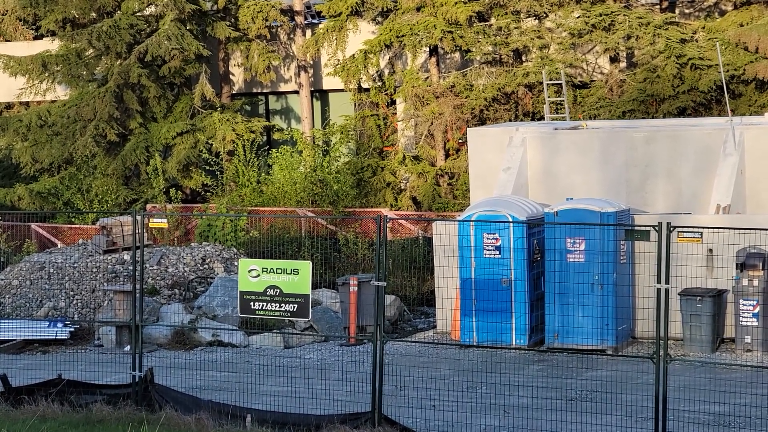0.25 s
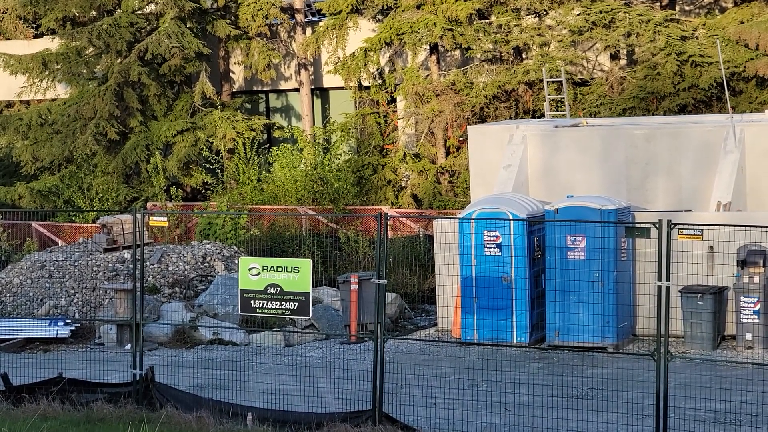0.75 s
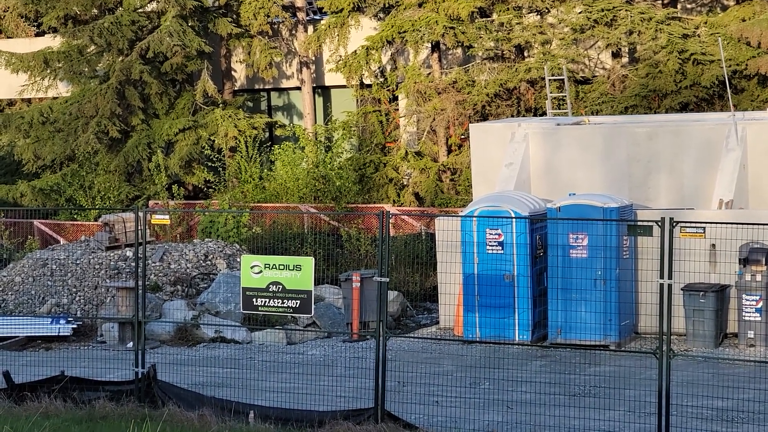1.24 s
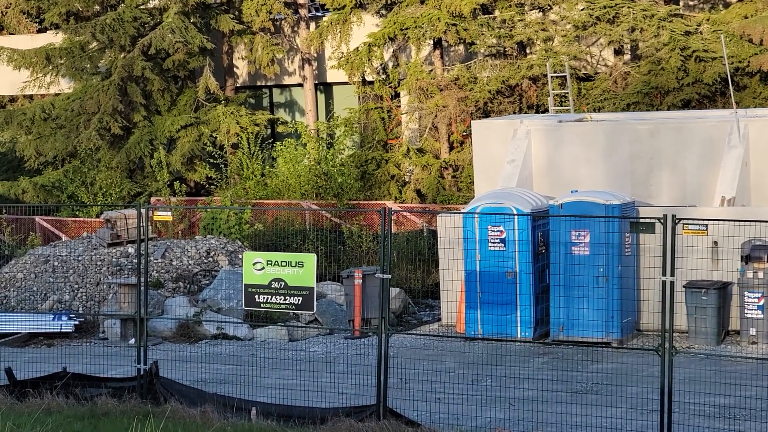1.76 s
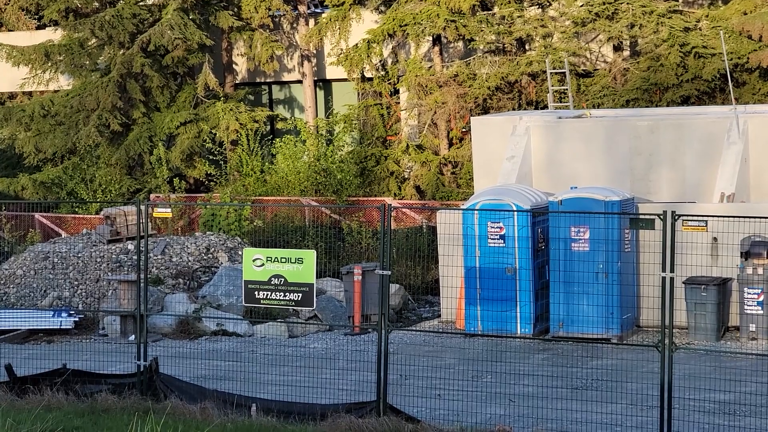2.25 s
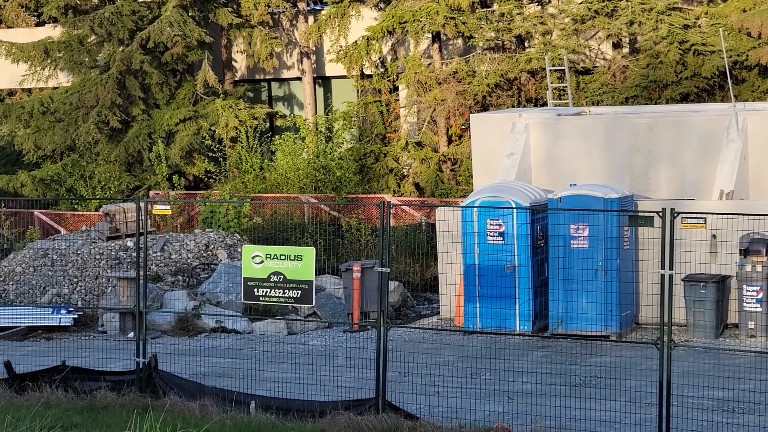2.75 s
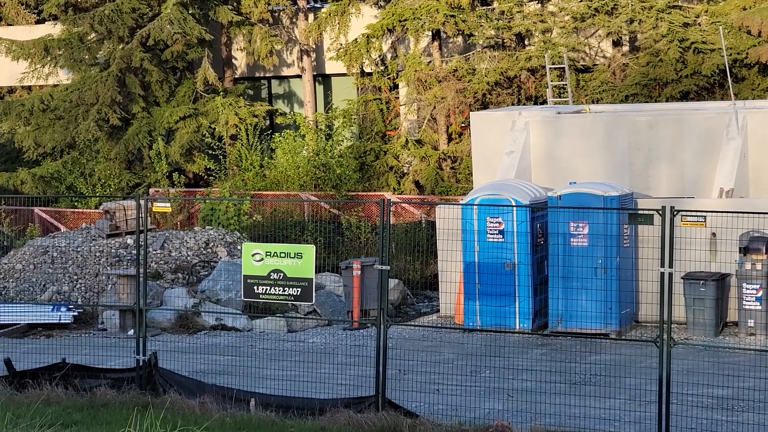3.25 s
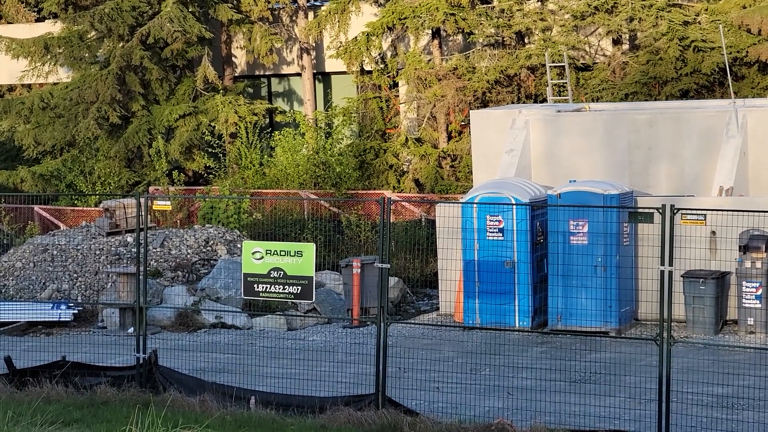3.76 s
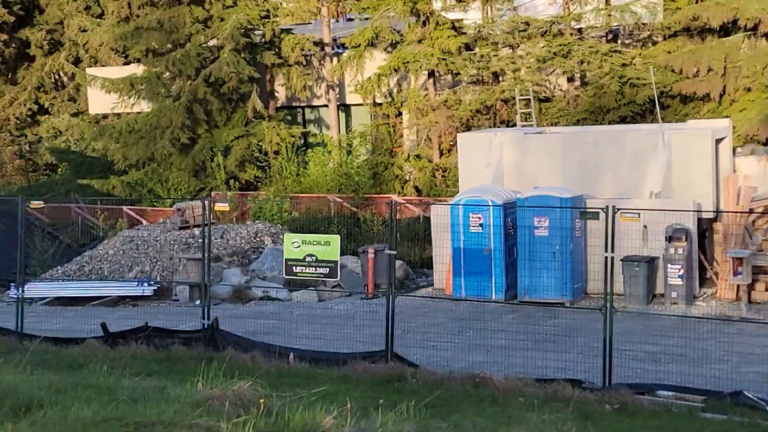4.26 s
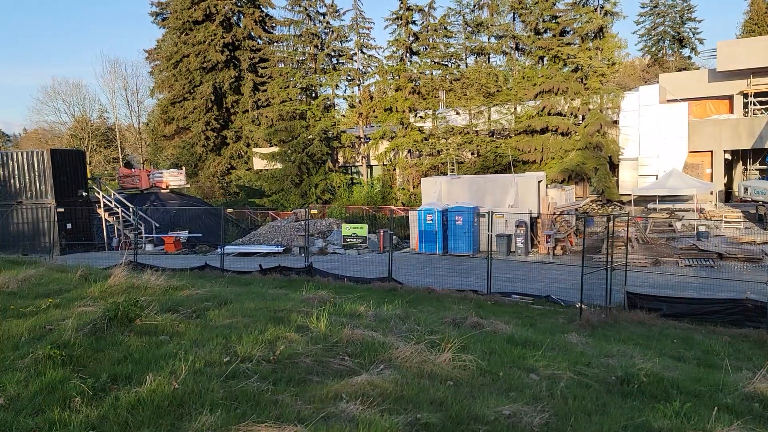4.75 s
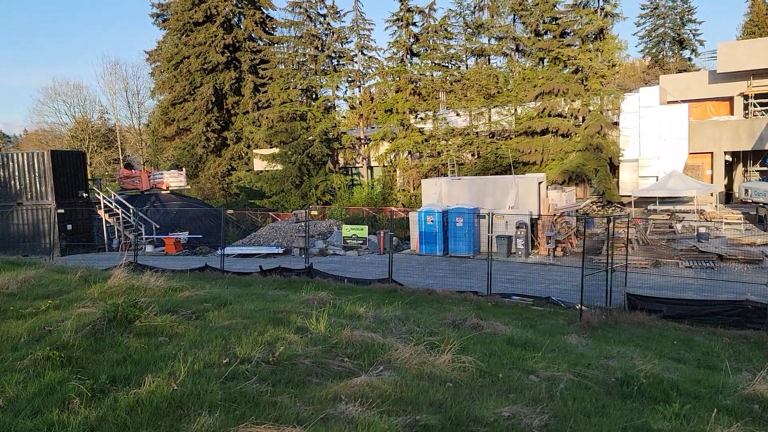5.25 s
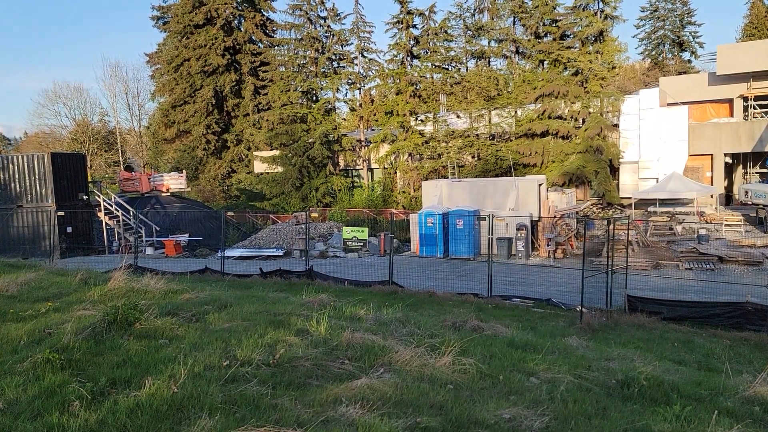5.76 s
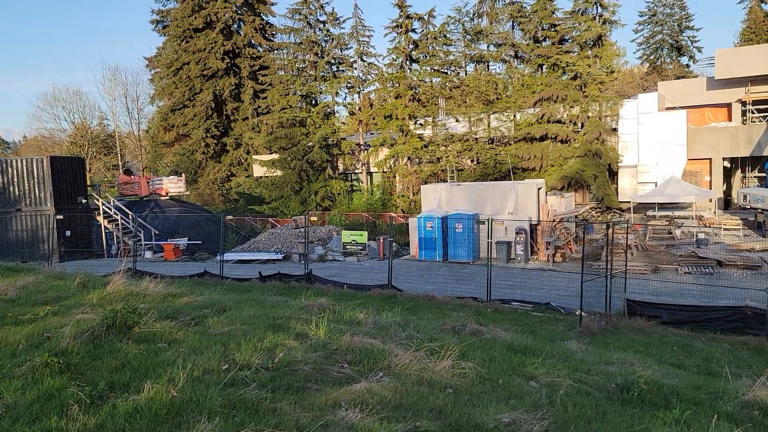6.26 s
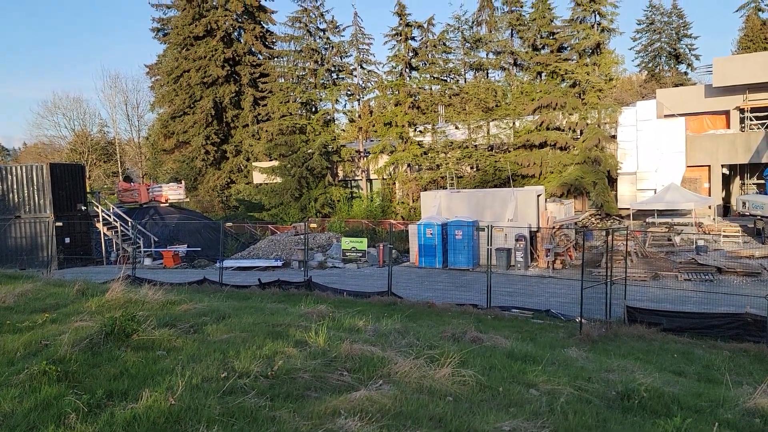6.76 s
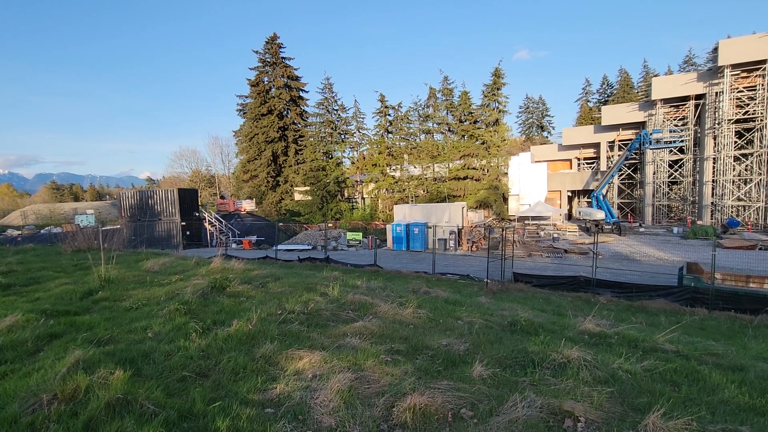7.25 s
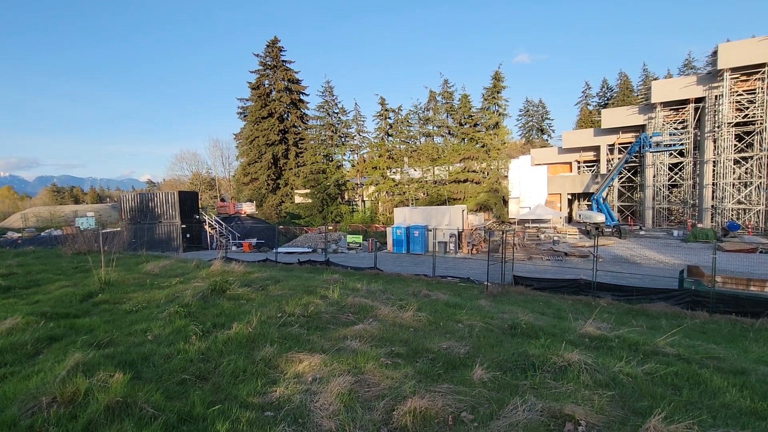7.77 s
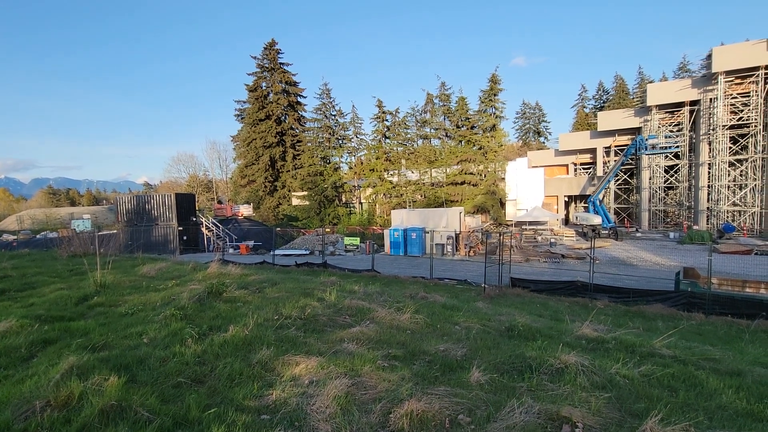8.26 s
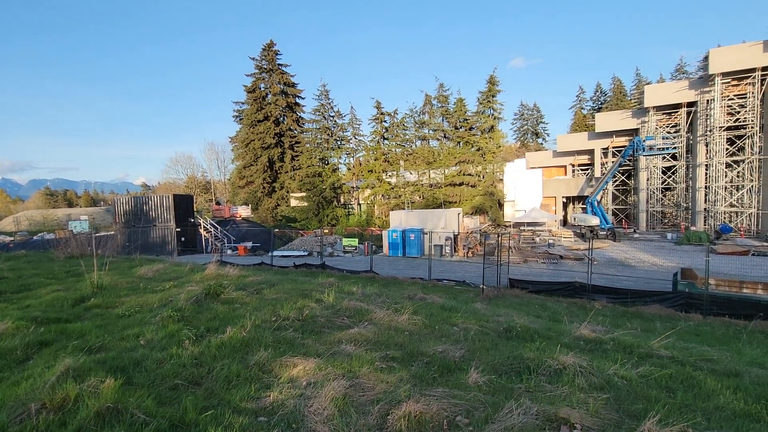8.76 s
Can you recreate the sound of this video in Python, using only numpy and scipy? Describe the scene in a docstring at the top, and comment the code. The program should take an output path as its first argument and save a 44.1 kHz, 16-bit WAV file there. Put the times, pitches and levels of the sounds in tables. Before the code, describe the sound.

Dozens of small tree frogs croak at once in a continuous, rapidly pulsing chorus. Songbirds are busiest in the first two seconds, with a quick falling trill, clear whistles and buzzy swoops, then sparser. Distant traffic and machinery rumble steadily beneath a faint leafy wash. Shortly after four seconds the stereo pickup widens, and everything becomes a little quieter and more distant. Open grassy ground beside trees and a building site.

```python
"""Dozens of small tree frogs call at once, with songbirds whistling and buzzing from the start.
Each croak is a pulsed harmonic tone coloured by the vocal sac; each bird note is a gliding near-sine.
Below lie the far rumble of traffic and machinery: shaped noise, and noise through narrow resonances.
A faint high wash, likely leaves, and microphone hiss are shaped noise too; a few dry ticks snap close by."""
import sys
import numpy as np
from scipy import signal
from scipy.fft import rfft, irfft, next_fast_len
from scipy.io import wavfile
from scipy.ndimage import uniform_filter1d

SR = 44100
rng = np.random.default_rng(int(sys.argv[2]) if len(sys.argv) > 2 else 0)


def dump_mix(stems):
    """Bounce the given channels to the path in sys.argv[1] as a 16-bit WAV at rate SR."""
    frames = np.atleast_2d(stems).T  # one column per channel
    limited = np.clip(frames, -1, 1)  # hard clip at full scale
    pcm = np.round(limited * 32767).astype(np.int16)
    wavfile.write(sys.argv[1], SR, pcm)


def volts(x):
    """Linear amplitude factor 10**(x/20) for a level x in dB, scalar or array-like."""
    e = np.asarray(x, float) / 20
    return 10 ** e


N = 397319  # length, samples


def rms_one(x):
    """Normalisation: scale to unit root-mean-square."""
    return x / np.sqrt(np.mean(x ** 2) + 1e-20)


def add(out, sound, s, pan_db, lag):
    """Stereo localisation by level and time: positive pan_db favours the left, lag delays it in samples."""
    for ear, gain, shift in zip(out, volts(np.array([pan_db, -pan_db]) / 2), (lag, 0)):
        start = round(s * SR) + int(shift)
        low, high = max(start, 0), min(start + len(sound), N)
        if high > low:
            ear[low:high] += gain * sound[low - start:high - start]


def field(x, t60, wet_db):
    """Scattering: trees and walls add an exponentially decaying noise tail, independent on each side."""
    t = np.arange(SR // 2) / SR
    tail = rng.standard_normal((2, len(t))) * volts(-60 * t / t60) * (t > .006)
    tail = tail / np.sqrt(np.sum(tail ** 2, axis=1, keepdims=True))
    return x + volts(wet_db) * signal.fftconvolve(x, tail, axes=1)[:, :N]


# Start and end of the relaxing of the microphone's focus: (t/s, t/s)
FOCUS_RELAXES = (3.8, 4.88)


def widened():
    """Directivity: 0 while the focus is narrow, rising to 1 once it is wide."""
    return np.interp(np.arange(N) / SR, FOCUS_RELAXES, (0, 1))


def at_hz(points, hz):
    """Spectral interpolation: a spectrum read on a log-frequency axis."""
    points = np.array(points)
    return np.interp(np.log(np.maximum(hz, 1)), np.log(points[:, 0]), points[:, 1])


# Left-right likeness of the noise field: (f/Hz, correlation)
LIKENESS = [(60, 0.97), (140, 0.92), (350, 0.8), (840, 0.3), (2030, 0.32), (4890, 0.02)]


def coloured_noise(spectrum):
    """Partial coherence: shaped stereo noise whose left-right likeness depends on frequency; rms 1."""
    size = next_fast_len(N)
    hz = np.arange(size // 2 + 1) * SR / size
    mid, side = rfft(rng.standard_normal((2, size)))
    alike = np.clip(at_hz(LIKENESS, hz), 0, 1)
    pair = np.sqrt(1 + alike) * mid + np.sqrt(1 - alike) * side * [[1], [-1]]
    return rms_one(irfft(pair * volts(at_hz(spectrum, hz)), size)[:, :N])


# Partials of a croak before the vocal sac: (multiple of the vocal fold pitch, level/dB)
CROAK_PARTIALS = [(1, -10), (2, -1), (3, -23), (4, -37), (5, -45), (6, -60)]


def croak(hz, pulse_rate, length_s, break_at, rise=0.0711, decay_ms=1.223, attack_ms=2.5):
    """Amplitude modulation: pulses of a rising harmonic tone form two syllables."""
    t = np.arange(int(length_s * SR)) / SR
    along = t / length_s
    phase = 2 * np.pi * np.cumsum(hz * (1 + rise * (along - .5))) / SR
    tone = sum(volts(db) * np.sin(multiple * phase) for multiple, db in CROAK_PARTIALS)
    # the pulses slow down through the call
    pulses_done = np.cumsum(1 - 0.252 * along) * pulse_rate / SR
    since_ms = 1000 * (pulses_done % 1) / pulse_rate
    pulse = (1 - np.exp(-(since_ms / attack_ms) ** 2)) * np.exp(-since_ms / decay_ms)
    pause = np.clip((np.abs(along - break_at) - .07) / 0.063, 0, 1)
    swell = np.clip(along / 0.046, 0, 1) * np.clip((1 - along) / 0.18, 0, 1)
    return tone * pulse * pause * swell


# Peaks and dip of the vocal sac's response: (f/Hz, width/Hz, level/dB)
SAC_RESPONSE = [(2259, 200, 3.5), (2785, 170, -6.5), (3663, 450, 7.5)]


def vocal_sac(x):
    """Resonance: the swollen throat lifts two bands of the croak and hollows the gap between them."""
    size = next_fast_len(N)
    hz = np.arange(size // 2 + 1) * SR / size
    lift_db = sum(db * np.exp(-((hz - centre_hz) / width_hz) ** 2)
                  for centre_hz, width_hz, db in SAC_RESPONSE)
    return irfft(rfft(x, size) * volts(lift_db), size)[:, :N]


# Level of the chorus as heard, before a common 3 dB lift; the step down after 4.3 s is the
# microphone's focus relaxing: (t/s, level/dB)
CHORUS_LEVEL = [(0, -49.5), (.22, -45), (.32, -50.5), (.48, -46), (.75, -50), (.95, -46), (1.15, -51),
                (1.38, -46.5), (1.68, -48.5), (1.79, -43.5), (1.9, -48), (2.6, -47), (3.0, -47),
                (3.3, -47.5), (4.3, -46.5), (4.5, -50.5), (6.1, -50), (6.2, -52), (7.23, -48),
                (7.73, -50.5), (8.58, -48.5), (8.76, -51.5), (8.96, -47.5)]


def frogs(count=64, period_s=.95, spread=.082, near_far_db=3):
    """Superposition: many callers, each with its own pace, pitch, distance and place, form one chorus."""
    middling_hz = 1069.4  # vocal fold pitch of a middling frog
    out = np.zeros((2, N))
    sizes = np.linspace(-1, 1, count)  # from the largest, lowest frog to the smallest
    for size, u, g in zip(sizes, rng.random((count, 4)), rng.standard_normal((count, 3))):
        starts = np.arange(-u[0], 11) * period_s * (.85 + .3 * u[1])
        for at, waver in zip(starts, rng.standard_normal((12, 2))):
            hz = middling_hz * np.exp(spread * size + .025 * waver[0])
            pulse_rate = (75 + 45 * u[2]) * (1 + 0.05247 * waver[1])
            call = croak(hz, pulse_rate, length_s=.22 + 0.0826 * u[3], break_at=0.621)
            add(out, volts(near_far_db * g[0]) * call, at, pan_db=0.34 * g[1] - .8, lag=4.4 * g[2])
    out = field(vocal_sac(out), t60=0.79, wet_db=-1.5)
    # even out the running level, then impose the level as heard
    loudness = np.sqrt(uniform_filter1d(np.mean(out ** 2, axis=0), int(.15 * SR)) + 1e-12)
    t, db = np.transpose(CHORUS_LEVEL)
    return out / loudness * volts(np.interp(np.arange(N) / SR, t, db) + 3.0)


# Wavering machine tones, relative to one another: (f/Hz, width/Hz, level/dB)
MACHINE_TONES = [(62.19, 0.36, -2.5), (74.7, 0.43, -8.5), (232.8, 6.1, -16), (562.6, 26, -19.5)]


def drones():
    """Narrow-band resonance: far engines as noise through sharp resonators, the same on both sides."""
    out = np.zeros(N)
    noises = rng.standard_normal((len(MACHINE_TONES), N + SR))
    for (hz, width_hz, db), noise in zip(MACHINE_TONES, noises):
        radius = np.exp(-np.pi * width_hz / SR)
        poles = [1, -2 * radius * np.cos(2 * np.pi * hz / SR), radius * radius]
        settled = signal.lfilter([1, 0, -1], poles, noise)[SR:]
        out += volts(db) * rms_one(settled)
    return out


# Spectrum of the rumble's noise: (f/Hz, level/dB per Hz)
RUMBLE_SPECTRUM = [(18, -38), (30, -8), (54, -4.5), (70, -3.5), (170, -21), (220, -49), (370, -120)]


def rumble():
    """Low-frequency noise with tonal drones in it; both sink as the focus relaxes."""
    narrow_db, loss_db = -48.5, 5.5
    return volts(narrow_db - loss_db * widened()) * (coloured_noise(RUMBLE_SPECTRUM) + volts(-2.0) * drones())


# Spectrum of the far traffic: (f/Hz, level/dB per Hz)
TRAFFIC_SPECTRUM = [(100, -15), (170, -8), (240, 2), (330, -3), (480, -9), (800, -13), (1500, -15),
                    (2800, -18), (6000, -42), (7500, -58.5), (9000, -78)]


def traffic():
    """Broadband noise: far traffic is a steady shaped noise that sinks as the focus relaxes."""
    narrow_db, loss_db = -57.5, 3.5
    return volts(narrow_db - loss_db * widened()) * coloured_noise(TRAFFIC_SPECTRUM)


# Spectrum of a faint high wash, likely leaves: (f/Hz, level/dB per Hz)
RUSTLE_SPECTRUM = [(2500, -21.5), (3800, 2), (5500, -6), (7000, -18), (8500, -41)]


def rustle():
    """Band-shaped noise: a faint high wash, likely leaves, that sinks as the focus relaxes."""
    narrow_db, loss_db = -75.5, 12
    return volts(narrow_db - loss_db * widened()) * coloured_noise(RUSTLE_SPECTRUM)


# Spectrum of the microphone hiss: (f/Hz, level/dB per Hz)
HISS_SPECTRUM = [(7000, -12), (10000, -11), (11800, -1), (16000, 1)]


def hiss():
    """Self-noise: the microphone's own high hiss, weaker at wide focus."""
    narrow_db, loss_db = -86, 7.5
    return volts(narrow_db - loss_db * widened()) * coloured_noise(HISS_SPECTRUM)


def glide(along, start_hz, middle_hz, end_hz):
    """Frequency modulation: an arch if the middle is near or outside the ends, else a bending slide."""
    a, m, b = np.log([start_hz, middle_hz, end_hz])
    done = (m - a) / (b - a + 1e-9)  # share of the slide done by half time
    if not .05 < done < .95:
        return np.exp(a + (b - a) * along + (4 * m - 2 * a - 2 * b) * along * (1 - along))
    bend = 2 * np.log(done / (1 - done)) + 1e-6
    return np.exp(a + (b - a) * np.expm1(-bend * along) / np.expm1(-bend))


def whistle(length_s, pitches_hz, db, warble_hz, dulling_db):
    """Near-sinusoidal source: strength tilts by dulling_db per octave; an unsteady syrinx makes it buzz."""
    along = np.arange(int(length_s * SR)) / (length_s * SR)
    hz = glide(along, *pitches_hz)
    shape = np.sin(np.pi * along) ** .42
    shape = shape * volts(db - dulling_db * np.log2(hz / min(pitches_hz)))
    flutter = rms_one(uniform_filter1d(rng.standard_normal(len(along)), size=40))
    return np.sqrt(2) * shape * np.sin(2 * np.pi * np.cumsum(hz + warble_hz * flutter) / SR)


# Start, middle and end of each trill note: (f/Hz, f/Hz, f/Hz)
TRILL_PITCHES = (7250, 6450, 5300)


def trill():
    """Periodic repetition: quick falling notes at the left that swell and fade."""
    out = np.zeros((2, N))
    start_s, step_s, note_s, count = .005, .0437, .0105, 11
    peak_s, peak_db, fade_db_per_s = .15, -66, 32
    for at, g in zip(start_s + step_s * np.arange(count), rng.standard_normal(count)):
        db = peak_db - fade_db_per_s * abs(at - peak_s) + 2 * g
        add(out, whistle(note_s, TRILL_PITCHES, db, 120, dulling_db=0), at, pan_db=7.0, lag=2)
    return out


# Shapes of bird notes: (start / middle pitch, end / middle pitch, warble/Hz, loss/dB per octave up)
# Notes of each shape: (t/s, length/s, middle f/Hz, level/dB before the tilt with pitch)
# level whistles that arch slightly
ARCH_SHAPE, ARCH_NOTES = (.9, .94, 25, 0), [(.053, 0.055, 4050, -57), (0.189, 0.038, 4050, -58.5),
                                        (.253, 0.055, 3930, -56.5), (0.384, 0.04, 3970, -61),
                                        (0.472, .05, 4025, -56), (0.604, 0.043, 3990, -59),
                                        (2.979, 0.064, 3970, -63), (3.222, 0.035, 3960, -65.5),
                                        (5.745, 0.025, 3820, -67), (6.041, 0.043, 3920, -67),
                                        (7.2, .03, 4760, -69.5), (7.569, 0.026, 4700, -70),
                                        (8.663, .04, 3830, -66), (8.785, 0.033, 3830, -69)]
# thin level wheezes
WHEEZE_SHAPE, WHEEZE_NOTES = (.96, .94, 300, 0), [(.15, .045, 5350, -71), (.368, .04, 5600, -72),
                                              (1.76, 0.065, 7350, -79), (1.835, .035, 7130, -79)]
# whistles that hold, then drop; the faint ones at 2.005 and 2.158 s are echoes of the notes before
DROP_SHAPE, DROP_NOTES = (1.055, .77, 35, 34), [(.725, .03, 4330, -51), (.844, .03, 4300, -48),
                                        (.982, .03, 4250, -45), (1.783, .052, 4520, -50),
                                        (1.934, .058, 4550, -50), (2.005, .035, 4520, -61),
                                        (2.096, .042, 4400, -50), (2.158, .037, 4520, -62),
                                        (6.95, .028, 4250, -59), (7.07, .037, 4330, -58),
                                        (7.228, .029, 4200, -58), (7.342, .026, 4100, -63),
                                        (7.47, .026, 4100, -63)]
# short straight falls
FALL_SHAPE, FALL_NOTES = (1.15, .9, 80, 8.5), [(.81, .032, 4250, -62), (2.665, .02, 4400, -68),
                                        (2.931, .025, 5900, -69), (5.83, .03, 3700, -65),
                                        (5.93, .03, 5000, -68), (7.69, .075, 4000, -69),
                                        (7.83, .025, 4900, -73), (8.37, .026, 4800, -67),
                                        (8.502, .022, 4700, -71), (8.879, .025, 4900, -73)]
# slurs that climb and level off
RISE_SHAPE, RISE_NOTES = (.9, 1.04, 90, -48), [(1.09, .05, 3750, -70), (5.63, .055, 3500, -69),
                                        (7.328, .016, 5450, -74), (7.395, .105, 3230, -65),
                                        (7.9, .088, 5150, -81), (8.036, .054, 4820, -73),
                                        (8.153, .068, 4880, -73), (8.255, .078, 4880, -73),
                                        (8.388, .048, 4800, -74), (8.826, .036, 3900, -74)]
# buzzy notes that shoot upward
BUZZ_SHAPE, BUZZ_NOTES = (0.8, 1.4, 580, 8.5), [(2.877, 0.044, 5400, -71), (3.099, 0.05, 5300, -72),
                                        (5.949, 0.052, 5330, -75)]
# notes that start loud and sag
HOOK_SHAPE, HOOK_NOTES = (1.05, .92, 60, -20), [(8.424, .045, 3800, -66), (8.552, .04, 3800, -68)]
# Swoops fall from one high pitch and flatten out: (t/s, length/s, end f/Hz, warble/Hz, level/dB before tilt)
SWOOP_NOTES = [(.204, .024, 5300, 45, -73), (.418, .026, 5200, 45, -76), (.628, .04, 4900, 45, -76),
               (.658, .07, 3600, 480, -59), (.912, .075, 3700, 480, -59), (2.321, .05, 4720, 120, -73),
               (2.428, .052, 4850, 100, -69), (3.155, .025, 5300, 45, -73), (5.365, .045, 4800, 120, -78),
               (5.472, .05, 4950, 120, -74), (7.625, .07, 4450, 60, -66)]


def songbirds():
    """Pitch contour: each note's start, middle and end pitch shape its whistle, buzz or swoop."""
    out = np.zeros((2, N))
    kinds = ((ARCH_SHAPE, ARCH_NOTES), (WHEEZE_SHAPE, WHEEZE_NOTES), (DROP_SHAPE, DROP_NOTES),
             (FALL_SHAPE, FALL_NOTES), (RISE_SHAPE, RISE_NOTES), (BUZZ_SHAPE, BUZZ_NOTES),
             (HOOK_SHAPE, HOOK_NOTES))
    notes = []
    for (start, end, warble_hz, dulling_db), rows in kinds:
        for s, length_s, hz, db in rows:
            notes.append((s, length_s, (start * hz, hz, end * hz), db, warble_hz, dulling_db))
    top_hz, fallen = 7800, .68  # swoops' starting pitch; share of the fall done by half time
    for s, length_s, hz, warble_hz, db in SWOOP_NOTES:
        middle_hz = top_hz * (hz / top_hz) ** fallen
        notes.append((s, length_s, (top_hz, middle_hz, hz), db, warble_hz, 16))
    for (s, length_s, pitches_hz, *voice), g in zip(notes, rng.standard_normal(len(notes))):
        # notes that reach above 5.9 kHz come from nearer the middle
        lag = 1 if max(pitches_hz) > 5900 else 3
        add(out, whistle(length_s, pitches_hz, *voice), s, pan_db=2 + 2 * g, lag=lag)
    return out


def birds():
    """Reverberation: the trill and the other bird notes share one scattering field."""
    return field(trill() + songbirds(), t60=.35, wet_db=-11)


# Dry ticks close by, level before the band filter: (t/s, level/dB, left minus right level/dB)
DRY_TICKS = [(0.595, -70, -4.5), (4.129, -62, -16), (6.245, -70, -1)]


def ticks():
    """Impulsive source: something small and dry snaps near the microphone, a decaying burst of bright noise."""
    out = np.zeros((2, N))
    snap = np.exp(-np.arange(60) / 7.4) * rng.standard_normal((len(DRY_TICKS), 60))
    for (s, db, pan_db), click in zip(DRY_TICKS, snap):
        add(out, volts(db) * click, s, pan_db, lag=0)
    return signal.sosfilt(signal.butter(2, [2500, 8000], "band", fs=SR, output="sos"), out)


def scene():
    """Superposition: frogs, birds and ticks over the far town and the high wash."""
    return frogs() + rumble() + traffic() + rustle() + birds() + ticks()


def low_pass(x):
    """Removes everything above the highest recorded frequency."""
    return signal.sosfilt(signal.butter(12, 15720, fs=SR, output="sos"), x)


def record(dry):
    """Transduction: the left port is less sensitive, more so at wide focus; both add their own hiss."""
    left_db, left_loss_db = -2.5, .6  # left minus right at narrow focus; further loss at wide focus
    balance_db = (left_db - left_loss_db * widened()) * np.array([[1], [-1]]) / 2
    heard = dry * volts(balance_db) + hiss()
    return low_pass(heard)


dry = scene()
out = record(dry)
dump_mix(out)
```